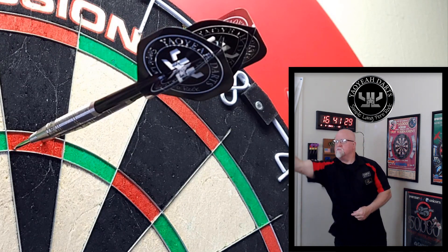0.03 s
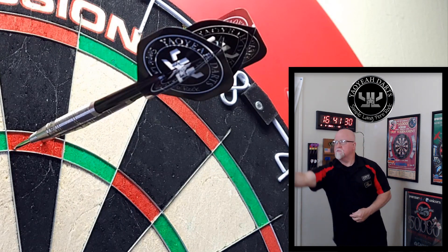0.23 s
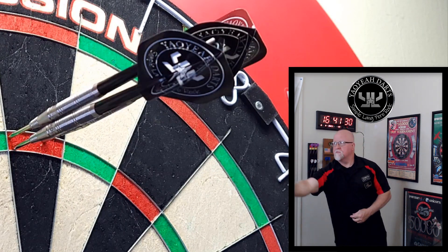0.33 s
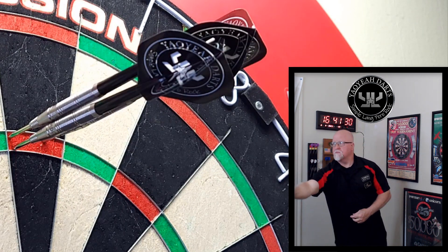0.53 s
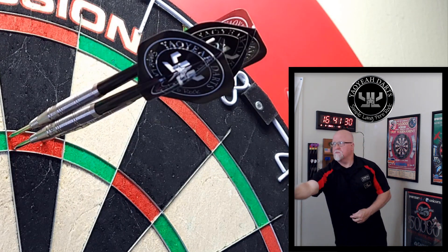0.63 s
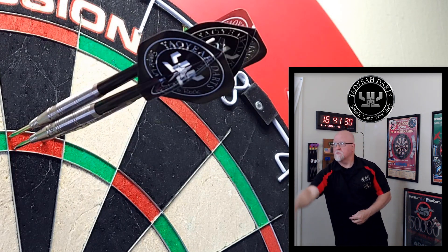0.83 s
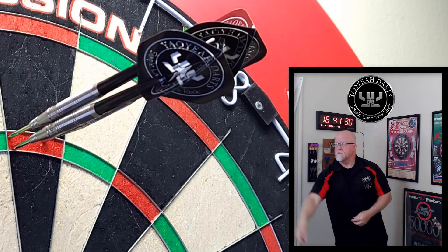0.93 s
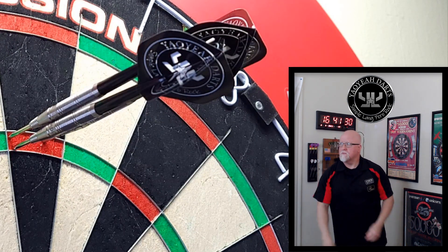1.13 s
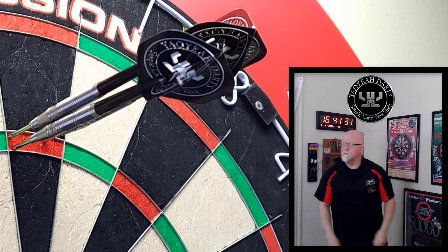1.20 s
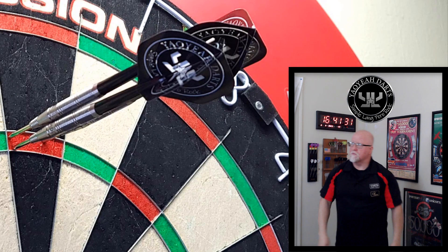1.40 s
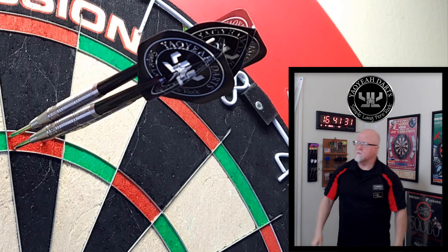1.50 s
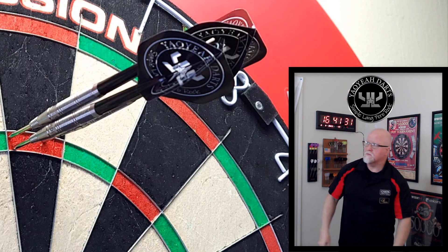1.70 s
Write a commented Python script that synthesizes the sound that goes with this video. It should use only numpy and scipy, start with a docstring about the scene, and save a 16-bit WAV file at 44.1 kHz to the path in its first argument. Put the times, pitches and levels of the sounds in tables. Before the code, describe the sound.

One dart hits a board with a metallic clack and thud, then soft footsteps scuff.

```python
"""A sleeve rustles after the throw. Close by, the dart brushes past the darts already in a bristle board,
clacks against them and thuds home at 0.25 s. Board and barrels ring briefly; a small room answers and
booms on its lowest mode until 0.6 s. From 1.4 s the thrower takes two scuffing steps.
Faint room noise and a low hum run throughout."""
import sys
import numpy as np
from scipy import signal
from scipy.fft import rfft, irfft
from scipy.io import wavfile

SR = 44100
rng = np.random.default_rng(int(sys.argv[2]) if len(sys.argv) > 2 else 0)


def log_audio(samples):
    """Write samples as a 16-bit WAV file to the path given in sys.argv[1]."""
    # one column per channel
    frames = np.atleast_2d(samples).T
    # limit to full scale, then quantise
    limited = np.clip(frames, -1, 1)
    pcm = np.round(limited * 32767).astype(np.int16)
    wavfile.write(sys.argv[1], SR, pcm)


N = 77175
T = np.arange(N) / SR
FREQ = np.maximum(np.arange(N // 2 + 1) * SR / N, 1)
LEFT_RIGHT = np.array([[1], [-1]])


# dart on dart: t/s, level/dB, rise/s, fade/s, left minus right/dB, tilt/(dB/octave)
CLACKS = [(0.2328, -39.5, 0.00092, 0.0087, 2.5, -1.4), (0.239, -28.5, .0004, 0.012, 3.5, -0.4),
          (.2420, -26, 0.0016, .010, -1, -1), (0.2505, -17.5, .0005, .0025, 4, 0.8),
          (0.2551, -17.5, .0002, 0.00096, -1.5, 2.5), (0.2583, -20, .0015, .005, -4.5, -0.64)]
# f/Hz, level/dB
CLACK_SPECTRUM = [(200, -9), (520, 3.5), (1000, -7.5), (1160, -0.5), (1330, -8), (1700, 4), (2500, -8),
                  (3300, -5.5), (4300, 1.5), (5700, -3), (7000, -1.5), (8700, -6), (11200, -3.5),
                  (13500, -7), (16000, -11.5)]
# barrels, shafts and wires: f/Hz, level/dB, t60/s
METAL_MODES = [(1597, -45, .19), (1712, -44, .17), (3328, -48, .19), (4014, -41, .2), (4290, -46, .23),
               (4461, -43.5, .2), (4660, -42.5, .19), (5055, -43, .2), (5594, -41.5, .2), (5877, -45, .2),
               (6382, -42.5, .2), (6993, -40.5, .19), (7941, -46, .18), (9764, -45, .16)]
# barrel on barrel: f/Hz, level/dB, t60/s
CLINK_MODES = [(10370, -23.5, 0.013), (11320, -20, 0.0095), (11980, -21, .011)]

def dart(room):
    """Point, barrel and flight graze the other darts in quick, growing clacks; the metal rings."""
    out = ring(METAL_MODES, start_s=.2503, rise_s=.0026, spread_rad=.5)
    out += ring(CLINK_MODES, start_s=.2556, rise_s=.0003, spread_rad=.5)
    for start_s, db, rise_s, fade_s, pan_db, tilt_db in CLACKS:
        spectrum = [(hz, level + tilt_db * np.log2(hz)) for hz, level in CLACK_SPECTRUM]
        force = undb(db) * pan(pan_db) * swell(start_s, rise_s, fade_s)
        out += burst(force, spectrum, room, width=.6, wet_db=-3.5)
    return out


# f/Hz, level/dB
KNOCK_SPECTRUM = [(30, -19.5), (70, -5), (150, 3.5), (300, -3), (500, 0), (1000, -12.5), (1700, -19),
                  (3000, -25)]
# board on its wall: f/Hz, level/dB, t60/s
BOARD_MODES = [(151, -35, .36), (196, -38, .25), (221, -34, .35), (254, -36, .15), (282, -42, .40),
               (355, -42, .33), (400, -32, .17), (492, -30, .15), (571, -40, .28), (667, -39, .19),
               (767, -36, .25), (810, -38, .18), (945, -38, .17), (1130, -43, .19)]

def board(room):
    """The fibres stop the dart with a dull knock; the whole board rocks and rings."""
    hit_s, rise_s = .2505, .0072
    rock_hz, rock_db, rock_t60_s = 135, -18.5, .1
    force = undb(-28) * swell(hit_s, rise_s, fade_s=.011)
    knock = burst(force, KNOCK_SPECTRUM, room, width=.35, wet_db=0)
    rocking = ring([(rock_hz, rock_db, rock_t60_s)], hit_s, rise_s=.011, spread_rad=.08)
    return knock + rocking + ring(BOARD_MODES, hit_s, rise_s, spread_rad=.2164)


def room_boom():
    """The room's lowest mode builds, decays and is faded out early."""
    hz, db, t60_s = 64.2, -34.5, 1.13
    end_s, release_s = .6, .076
    mode = ring([(hz, db, t60_s)], start_s=.27, rise_s=.048, spread_rad=.15)
    return mode * np.clip((end_s - T) / release_s, 0, 1)


# soles scuffing, then taking the weight: t/s, level/dB, rise/s, fade/s
SOLE_SCUFFS = [(1.426, -49, 0.04, 0.033), (1.580, -63.5, 0.043, 0.026), (1.623, -59.5, 0.018, 0.022)]
SOLE_LOADS = [(1.427, -51.5, 0.0026, 0.021), (1.507, -52.5, 0.007, 0.027), (1.632, -53, 0.017, 0.0088)]
# shoes and clothes: t/s, level/dB, fade/s
SMALL_TICKS = [(0.149, -65, 0.0023), (.168, -62, .008), (1.4295, -57, .003), (1.4427, -51, 0.0064),
               (1.6238, -48.5, 0.00087)]
# f/Hz, level/dB
SLEEVE_SPECTRUM = [(100, 3), (400, 1.5), (1200, -11), (3500, -13), (8000, -19.5), (11500, -22),
                   (14000, -48.5)]
SCUFF_SPECTRUM = [(100, -6), (300, 4.5), (700, 4), (1500, -1.5), (3000, -6), (6000, -10.5), (10000, -17.5),
                  (13000, -22), (16000, -45)]
LOAD_SPECTRUM = [(30, -26), (70, -17), (110, -5), (160, 3.5), (220, -2.5), (310, 1.5), (600, -10),
                 (1500, -29), (6000, -54)]
TICK_SPECTRUM = [(200, -2), (1500, 0.5), (4500, -2), (8000, -6), (12000, -18.5), (16000, -39.5)]

def thrower(room):
    """A sleeve rustles, shoes and clothes tick, soles scuff and take the weight."""
    sleeve = undb(-62.5) * np.exp(-T / .21)
    scuffs = sum(undb(db) * swell(t, rise_s, fade_s) for t, db, rise_s, fade_s in SOLE_SCUFFS)
    loads = sum(undb(db) * swell(t, rise_s, fade_s) for t, db, rise_s, fade_s in SOLE_LOADS)
    ticks = sum(undb(db) * swell(t, .0003, fade_s) for t, db, fade_s in SMALL_TICKS)
    parts = [(sleeve, SLEEVE_SPECTRUM), (scuffs, SCUFF_SPECTRUM),
             (loads, LOAD_SPECTRUM), (ticks, TICK_SPECTRUM)]
    return sum(burst(force, spectrum, room, width=.68, wet_db=-5.5) for force, spectrum in parts)


# f/Hz, t60/s
REVERB_DECAY = [(150, 0.5266), (700, 0.4365), (4000, 0.3635), (8000, 0.2318), (15000, 0.25)]
# f/Hz, level/dB
REVERB_SPECTRUM = [(60, 10), (300, 2.5), (1000, 2), (1800, 0), (4200, 1.5), (6000, -1.5), (7300, 2.5),
                   (11000, -0.5), (16000, -2.5)]

def room_response():
    """Dense reflections that die sooner in the treble."""
    spectrum = rfft(noise(REVERB_SPECTRUM, width=.4))
    bands_hz, t60s_s = zip(*REVERB_DECAY)
    out = 0
    for one_band, t60_s in zip(np.eye(len(bands_hz)), t60s_s):
        band = irfft(spectrum * curve(list(zip(bands_hz, one_band))), N)
        out += band * swell(0, rise_s=.0043, fade_s=t60_s / np.log(1000))
    return out / np.sqrt(np.sum(out ** 2) / 2)


# f/Hz, level/dB
ROOM_NOISE_SPECTRUM = [(25, -24), (45, -12), (62, 0.5), (90, -10.5), (140, -10), (210, -14), (265, -21.5),
                       (335, -16.5), (400, -24), (700, -26.5), (1400, -34.5), (2800, -35), (5000, -43),
                       (7500, -45.5), (11000, -52), (13000, -68.5)]

def background():
    """Faint room noise and a wavering low hum."""
    hum_hz, hum_db, waver_db = 61.65, -62, 3.5
    waver = noise([(1, 0), (8, 0), (20, -40), (60, -120)], width=0)[0]
    hum = undb(hum_db + waver_db * waver) * np.sin(2 * np.pi * hum_hz * T)
    return undb(-57.5) * noise(ROOM_NOISE_SPECTRUM, width=1) + hum


def ring(modes, start_s, rise_s, spread_rad):
    """Struck modes, each with a random phase offset between the channels."""
    out = 0
    for hz, db, t60_s in modes:
        offset_rad = spread_rad * rng.standard_normal() * LEFT_RIGHT
        envelope = undb(db) * swell(start_s, rise_s, t60_s / np.log(1000))
        out += envelope * np.sin(2 * np.pi * hz * (T - start_s) + offset_rad)
    return out


def burst(envelope, spectrum, room, width, wet_db):
    """A noisy contact plus its reflections."""
    direct = envelope * noise(spectrum, width)
    return direct + undb(wet_db) * signal.fftconvolve(direct, room, axes=1)[:, :N]


def noise(spectrum, width):
    """Coloured stereo noise of unit RMS, narrower in the bass."""
    narrow_below_hz = 466
    mid, side = undb(curve(spectrum)) * np.exp(2j * np.pi * rng.random((2, len(FREQ))))
    side = side * width * (.29 + .73 * FREQ / (FREQ + narrow_below_hz))
    stereo = irfft(np.array([mid + side, mid - side]), N)
    return stereo / stereo.std()


def swell(start_s, rise_s, fade_s):
    """Linear rise, then exponential fade with time constant fade_s."""
    attack = np.clip((T - start_s) / rise_s, 0, 1)
    return attack * np.exp(-np.maximum(T - start_s - rise_s, 0) / fade_s)


def curve(points):
    """Rows of (f/Hz, value), interpolated over log frequency."""
    hz, value = np.array(points, float).T
    return np.interp(np.log(FREQ), np.log(hz), value)


def pan(left_db):
    """Channel gains, left above right by left_db."""
    return undb(LEFT_RIGHT * left_db / 2)


def undb(db):
    """Decibels to gain."""
    return 10 ** (np.asarray(db) / 20)


def scene():
    """All sources in one small room, slightly left."""
    room = room_response()
    return (dart(room) + board(room) + room_boom() + thrower(room) + background()) * pan(left_db=1.2)


def record(dry):
    """Steep low-pass on the top treble."""
    cutoff_hz = 15700
    return signal.sosfilt(signal.ellip(10, .2, 80, cutoff_hz, fs=SR, output="sos"), dry)


dry = scene()
out = record(dry)
log_audio(out)
```